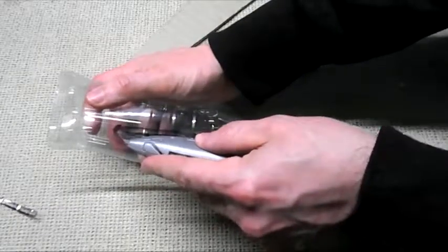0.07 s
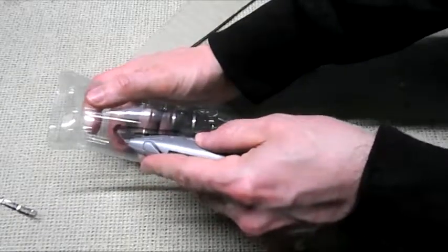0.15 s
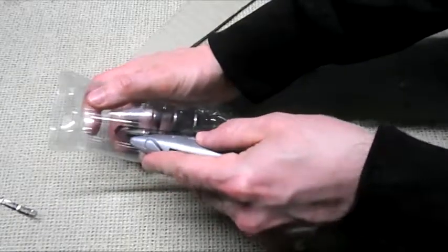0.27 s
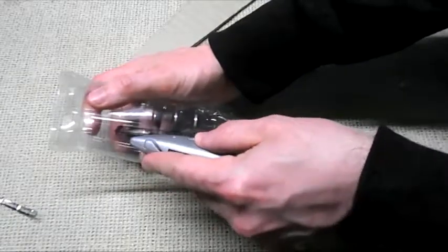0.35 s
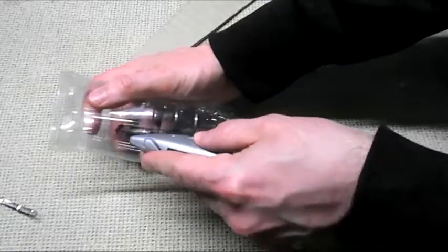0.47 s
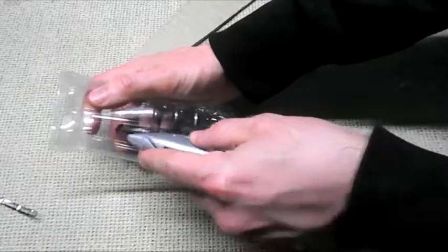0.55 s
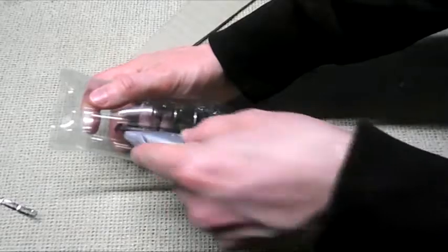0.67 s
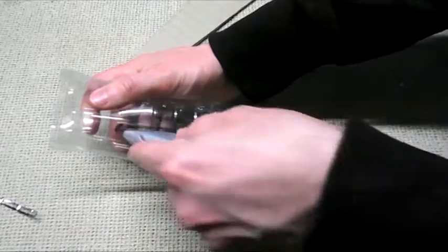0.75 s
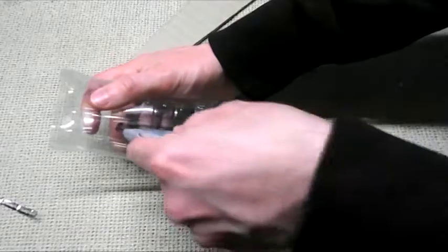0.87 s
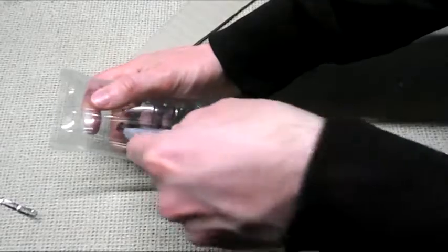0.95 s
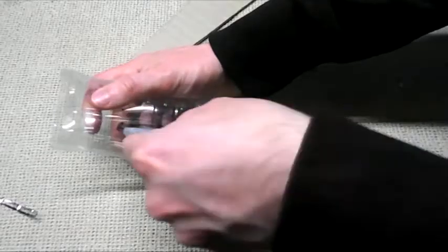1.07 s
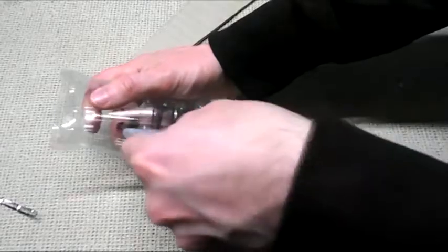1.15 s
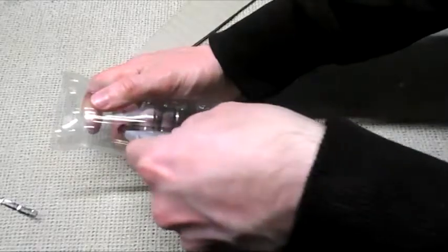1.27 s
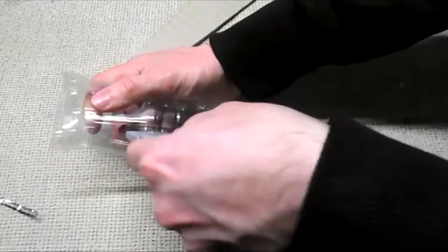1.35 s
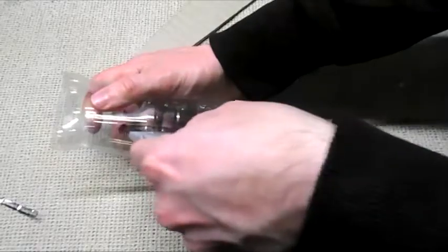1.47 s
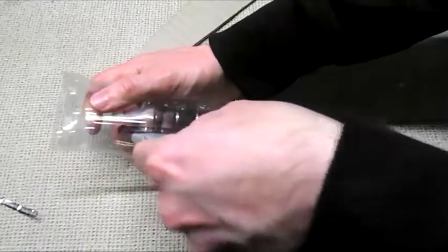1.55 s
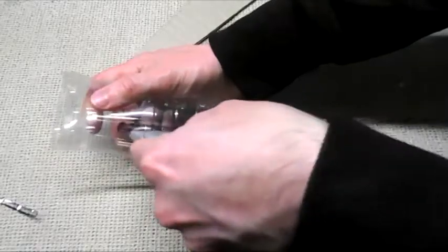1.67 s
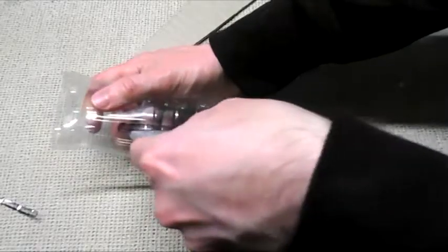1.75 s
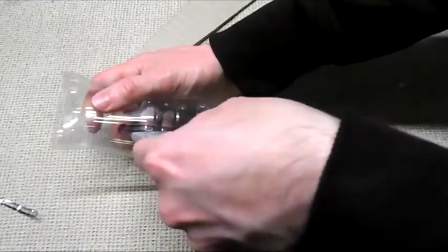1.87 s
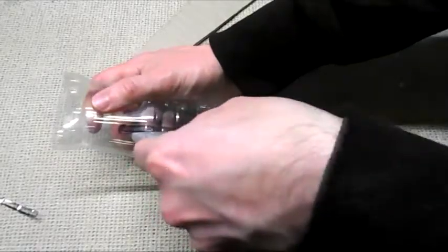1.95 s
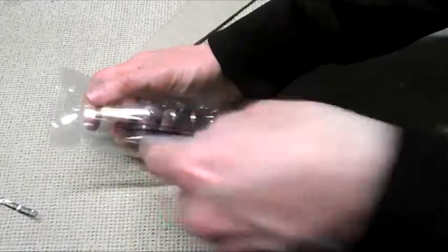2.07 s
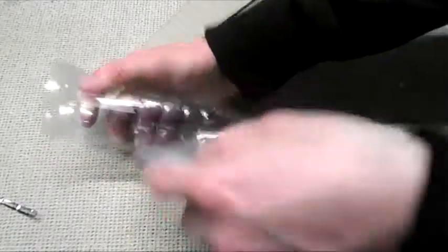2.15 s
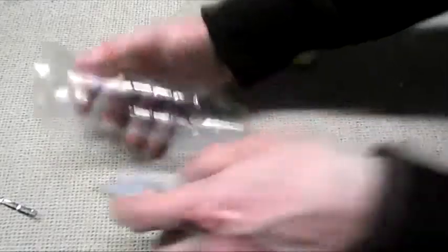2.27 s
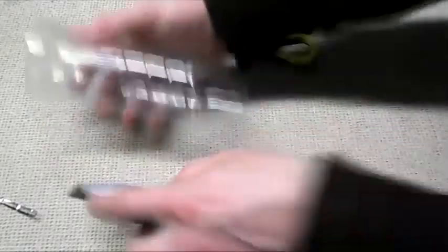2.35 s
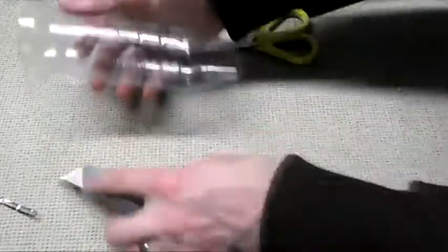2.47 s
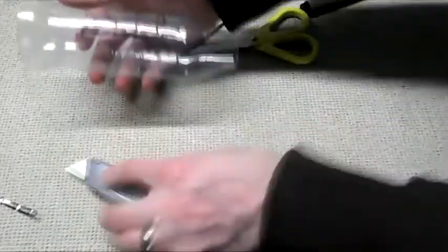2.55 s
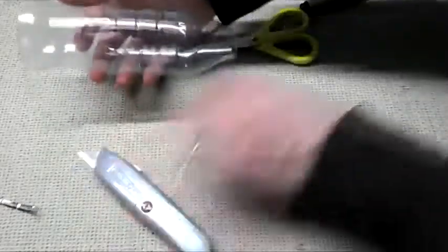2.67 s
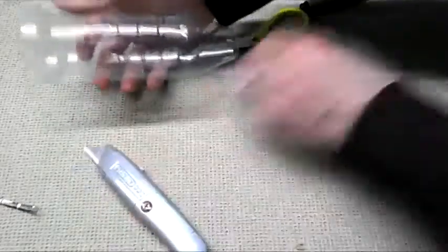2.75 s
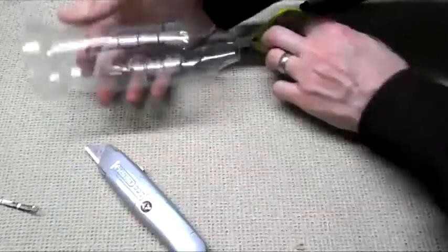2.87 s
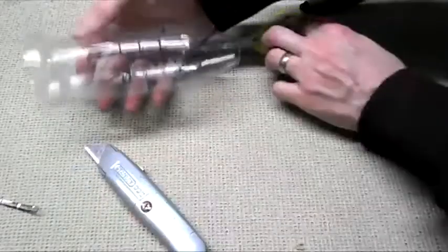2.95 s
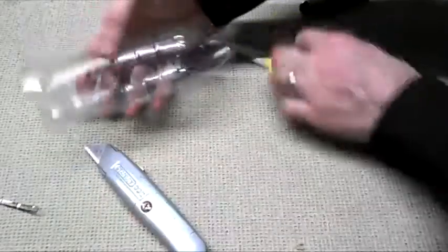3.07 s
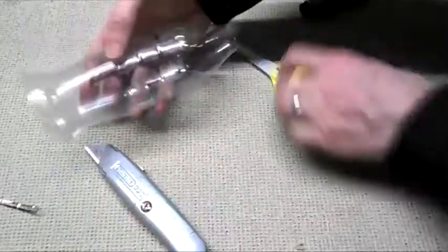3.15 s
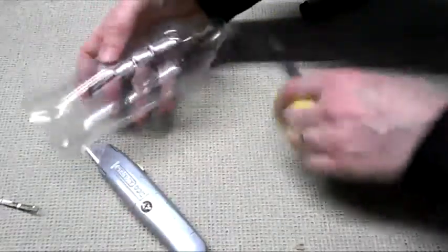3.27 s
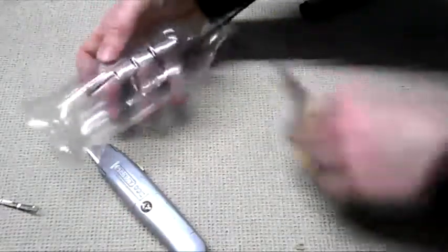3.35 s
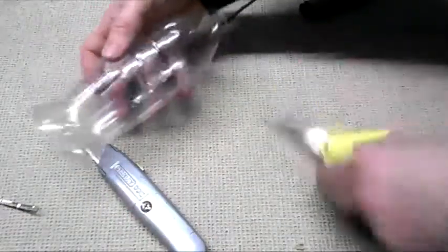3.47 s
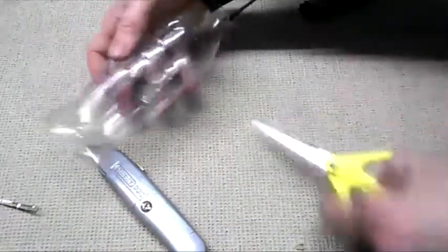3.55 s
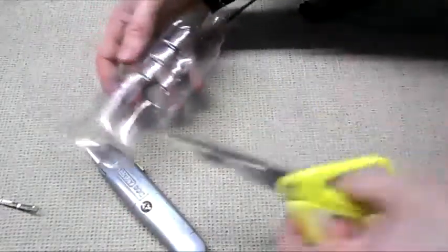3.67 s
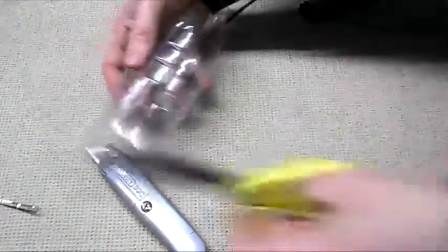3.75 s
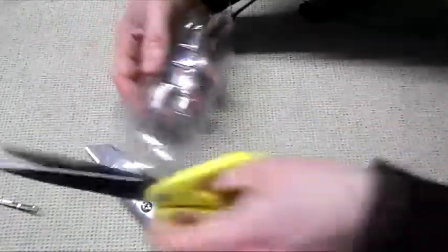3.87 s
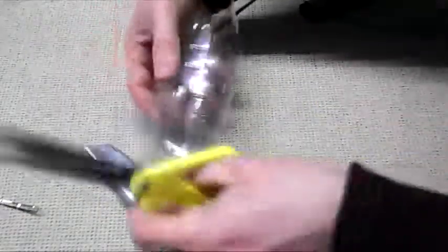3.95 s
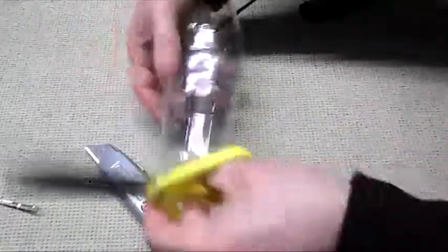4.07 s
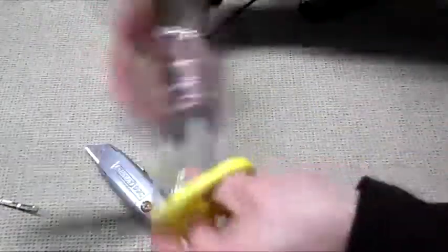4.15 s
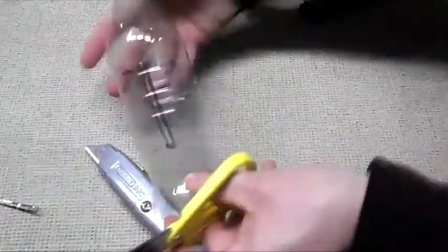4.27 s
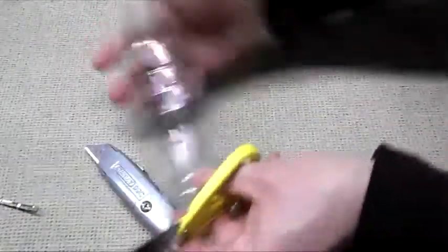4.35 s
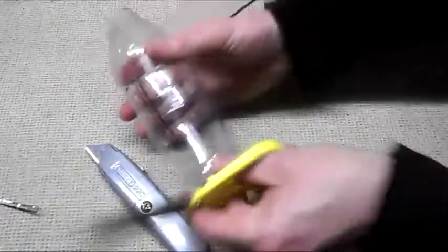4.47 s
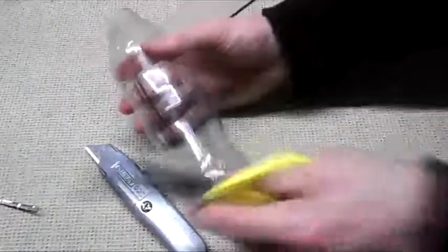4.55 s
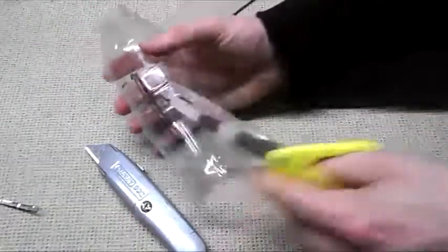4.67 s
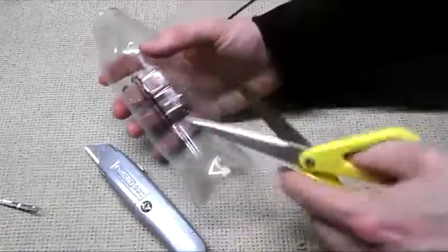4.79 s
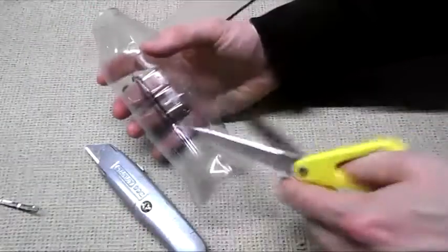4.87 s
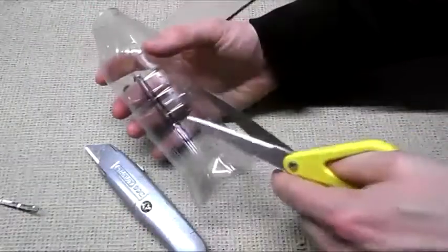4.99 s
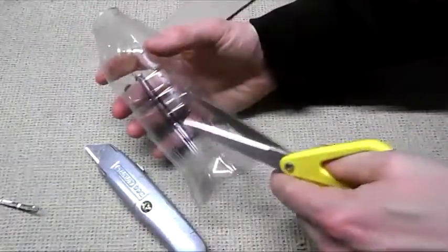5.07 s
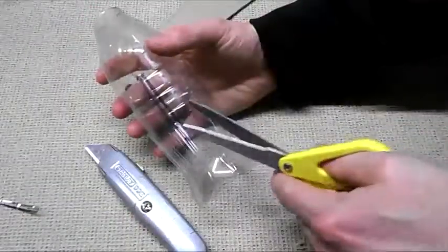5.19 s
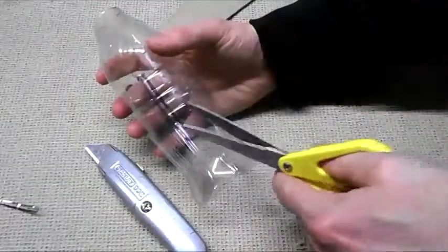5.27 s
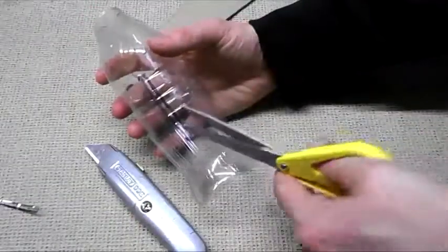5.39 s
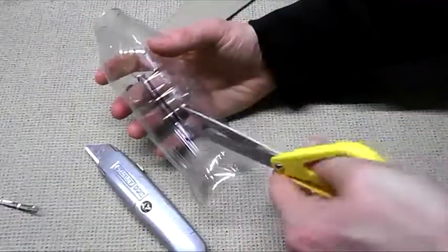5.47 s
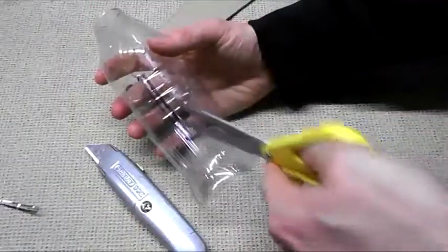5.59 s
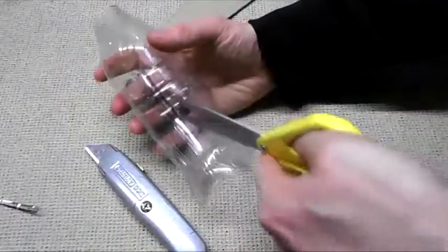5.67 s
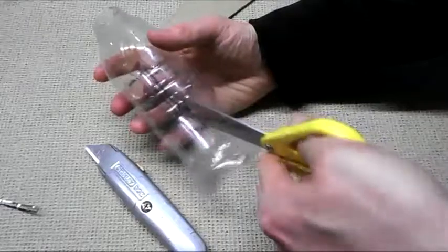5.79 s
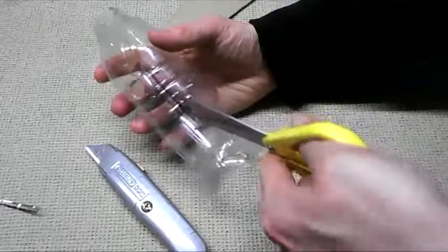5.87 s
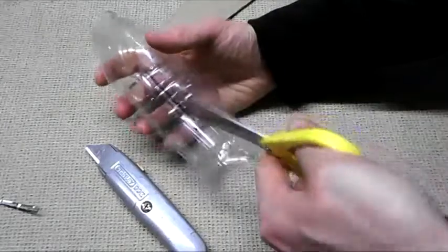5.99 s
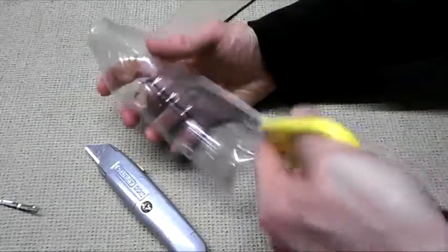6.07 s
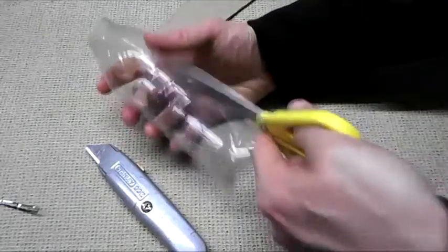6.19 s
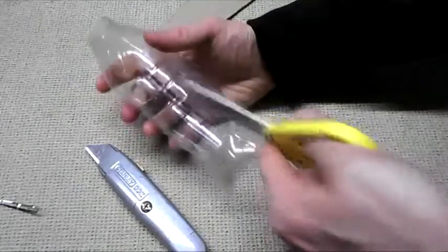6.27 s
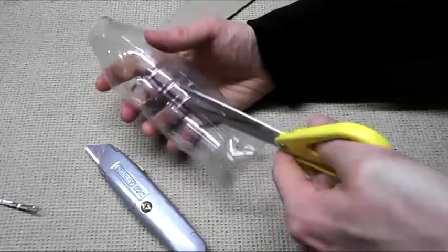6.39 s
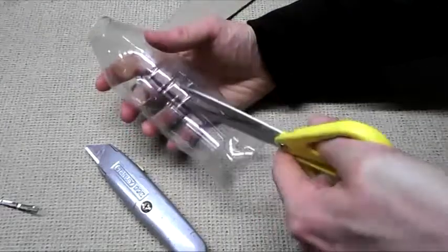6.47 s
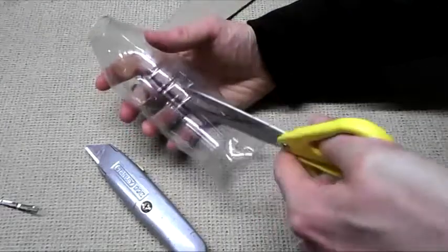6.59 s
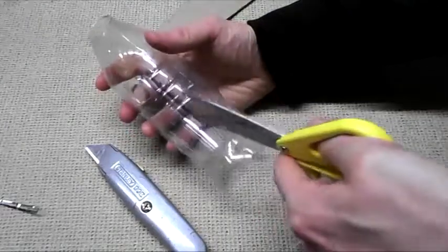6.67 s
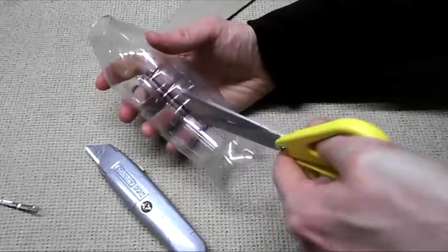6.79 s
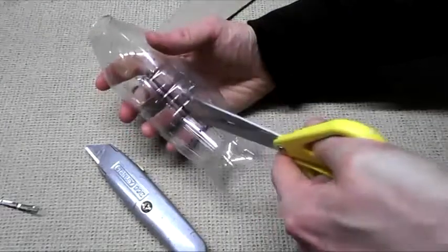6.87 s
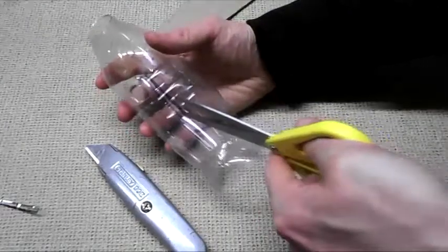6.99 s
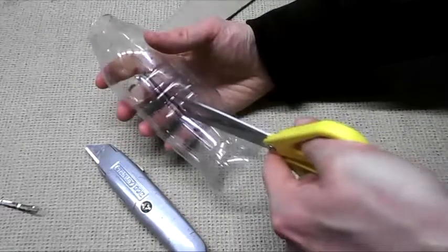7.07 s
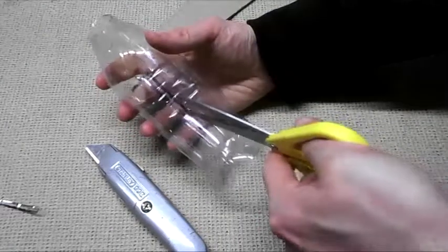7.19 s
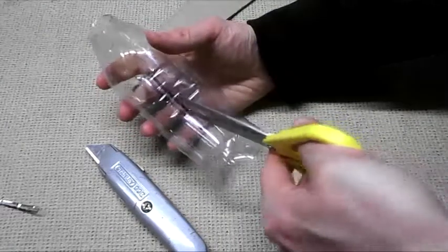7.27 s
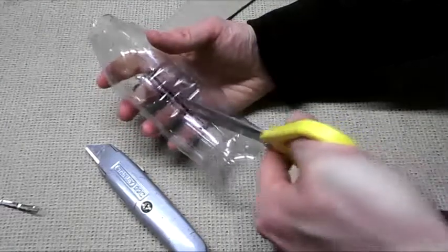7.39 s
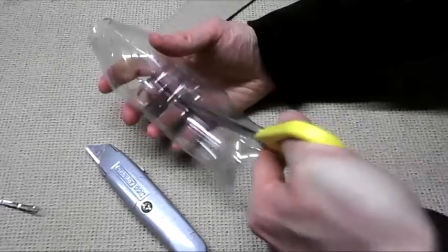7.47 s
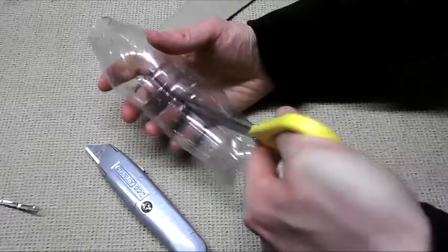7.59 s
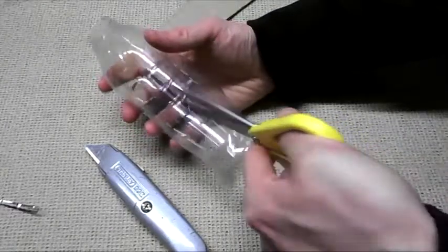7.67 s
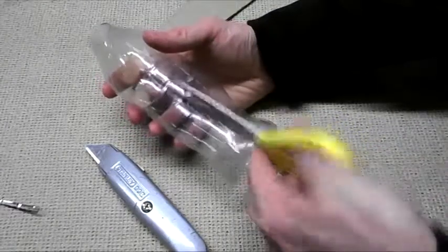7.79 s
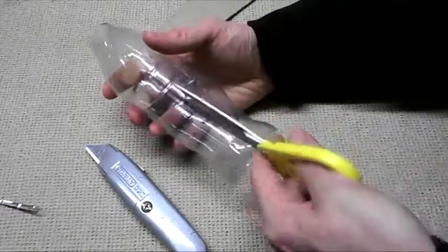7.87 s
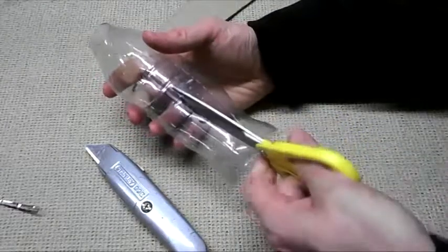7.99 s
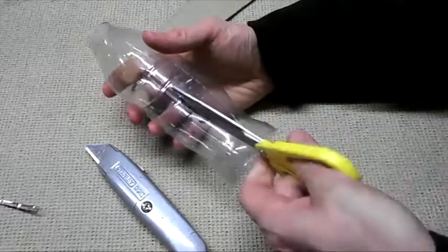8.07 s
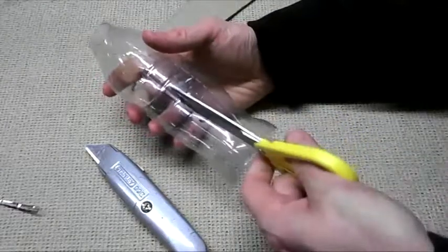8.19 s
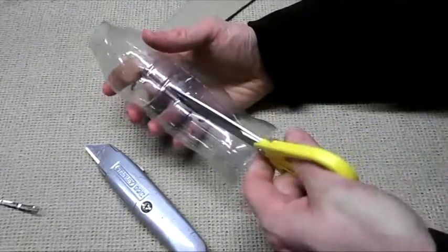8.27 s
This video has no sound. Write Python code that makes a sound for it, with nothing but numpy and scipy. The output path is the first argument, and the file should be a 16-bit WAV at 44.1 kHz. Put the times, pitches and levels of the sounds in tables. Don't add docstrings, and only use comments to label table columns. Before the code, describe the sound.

Thin plastic bottle pops and creaks under a knife, the knife drops with a steel rattle, then scissors drag and snip crackling plastic.

```python
import sys
import numpy as np
from scipy import signal
from scipy.fft import rfft, irfft, next_fast_len
from scipy.io import wavfile
from scipy.ndimage import uniform_filter1d

SR = 44100
rng = np.random.default_rng(int(sys.argv[2]) if len(sys.argv) > 2 else 0)


def bounce(signal):
    frames = np.transpose(np.atleast_2d(signal))
    limited = np.clip(frames, -1, 1)
    pcm = np.round(limited * 32767).astype(np.int16)
    wavfile.write(sys.argv[1], SR, pcm)


def level_to_linear(level):
    exponent = np.asarray(level, float) / 20
    return 10 ** exponent


N = 367353
KNIFE_LANDS_S = 2.627


def unit(x):
    return x / np.sqrt(np.mean(x ** 2) + 1e-20)


def along(points, hz):
    f, value = np.transpose(points)
    return np.interp(np.log(hz + 1), np.log(f + 1), value)


def curves(rows):
    s, *columns = np.transpose(rows)
    return [np.interp(np.arange(N) / SR, s, column) for column in columns]


def filtered(x, response):
    m = next_fast_len(N + 8192)
    return irfft(rfft(x, m) * response(np.fft.rfftfreq(m, 1 / SR)), m)[..., :N]


def bass_cut(x, hz0):
    return filtered(x, lambda hz: (1j * hz / (hz0 + 1j * hz)) ** 2)


def ringing(x, modes):
    def gain(f):
        total = 0
        for k, (center, width, db) in enumerate(modes):
            loss = 1j * f * width
            total = total + (-1) ** k * level_to_linear(db) * loss / (center * center - f * f + loss)
        return total
    power = np.mean(abs(gain(np.linspace(0, SR / 2, 4096))) ** 2)
    return filtered(x, gain) / np.sqrt(power)


def bottle(x, gripped, held):
    lift_s = 2.4
    early = np.arange(N) < lift_s * SR
    return ringing(x * early, gripped) + ringing(x * ~early, held)


def gritty(spread_db, life):
    size = np.zeros(N)
    for span in (life, 5 * life):
        knots = np.minimum(rng.exponential(size=int(N / SR / span) + 4), 2.5)
        size += np.interp(np.arange(N) / SR / span, np.arange(len(knots)), knots)
    return unit(rng.standard_normal(N) * level_to_linear(spread_db * size))


def patchy(x, depth_db):
    z = signal.stft(x, nperseg=256)[2]
    field = uniform_filter1d(rng.standard_normal(z.shape), size=4, axis=0)
    field = uniform_filter1d(field, size=10, axis=1)
    return unit(signal.istft(z * level_to_linear(depth_db * unit(field)), nperseg=256)[1][:N])


def stroked(tables, column, trail=0.067):
    gain = np.zeros(N)
    for rows in map(np.transpose, tables):
        stop = min(N, round((rows[0, -1] + 0.7 * trail) * SR))
        at = np.arange(round(rows[0, 0] * SR), stop)
        rise = (at - at[0]) / SR / 0.012
        fall = (at[-1] - at) / SR / trail
        ends = np.clip(np.minimum(rise, fall), 0, 1)
        gain[at] += ends ** 2 * level_to_linear(np.interp(at / SR, rows[0], rows[column]))
    return gain


def ramps(strokes):
    tables = []
    for s, length, db, change_db, body_db in strokes:
        end_db = db + change_db
        tables.append([(s, db + body_db, db), (s + length, end_db + body_db, end_db)])
    return tables


# f/Hz, level/dB per Hz
HUM = [(25, -30), (44, -15.5), (188, -0.5), (286, 0), (557, -6.5), (1290, -10), (2570, -16.5),
       (6000, -20.5)]


def air():
    spectrum = HUM + [(9000, -30.5)]
    hum = unit(filtered(patchy(rng.standard_normal(N), depth_db=1.5), lambda hz: level_to_linear(along(spectrum, hz))))
    hiss = ringing(patchy(rng.standard_normal(N), depth_db=3.0), [(11140, 1900, 0)])
    return level_to_linear(-60.5) * hum + level_to_linear(-72.0) * hiss


# t/s, level/dB, sharpness/dB (crisp top over hollow), burst t60/s
KNIFE_POPS = [(.0876, -49.5, 29, 0.017), (.278, -30, 6, 0.03), (.2863, -29, 34.5, 0.011),
              (.3965, -40, -7, 0.015), (.417, -36, -7, 0.023), (.5819, -37, 9, 0.015),
              (1.248, -40.5, 3, 0.0085), (1.7345, -33, -1, 0.027), (2.1325, -20.5, 10, 0.0025)]
TURN_POPS = [(3.821, -39.5, 16, 0.011), (3.8361, -35, 11, 0.013), (3.9823, -54.5, 43, 0.062),
             (4.157, -34.5, 6, 0.012), (4.1885, -27.5, 17, 0.064), (4.232, -47, 41, 0.036),
             (4.2993, -36.5, 6.9, 0.031), (4.481, -29, 20.6, 0.0066), (4.5525, -30, 5, 0.023),
             (4.5764, -33, 5.7, .02), (4.6015, -32, 5.5, 0.027), (4.6763, -36, 5.4, 0.099),
             (4.8306, -39, 28, 0.065), (4.8595, -57, 45, 0.012), (5.1361, -27, 1, 0.031)]
SNIP_POPS = [(5.668, -33, -6.5, 0.018), (5.699, -30, 1, 0.035), (5.736, -29, -10.5, 0.06),
             (5.859, -31, 0, 0.04), (5.9955, -41.5, 11, 0.0052), (6.019, -31.5, -5, 0.045),
             (6.0373, -25.5, -1.5, 0.074), (6.116, -31, 21, 0.03), (6.1354, -12, 8, 0.012),
             (6.164, -24, -7, 0.049), (6.204, -22, 11, 0.014), (6.322, -23.5, 2, 0.0042),
             (6.5017, -25.5, 1.5, 0.013), (6.703, -42, 9, .015), (6.777, -26, 18, 0.035),
             (6.7859, -19, 9.5, 0.021), (7.076, -39, 6, 0.021), (7.1063, -34.5, -15, 0.046),
             (7.127, -31, 11.5, 0.05), (7.5446, -8, -7.5, 0.013), (7.8311, -29.5, -2, 0.0093),
             (7.983, -35.5, 3, 0.032)]
# t/s, level/dB
TICKS = [(3.0215, -43), (3.3414, -28.5), (3.3558, -27), (3.457, -27), (3.467, -27.5), (3.479, -24.5),
         (3.4919, -23), (3.507, -25), (3.527, -29), (3.5641, -27.5), (3.5832, -26.5), (3.6023, -24)]
# t/s, level/dB, sharpness/dB, burst t60/s, panel f/Hz
SNAPS = [(0.6666, -25.5, -1, 0.0076, 1540), (0.7405, -26.5, 24.5, 0.0069, 1860),
         (1.1868, -41, 3, 0.033, 1760), (1.2651, -27, -17.5, 0.02, 1520), (1.6137, -41.5, 23, 0.027, 1630),
         (1.696, -24.5, 21.5, 0.014, 2040), (2.1841, -16.5, 11, 0.017, 1240),
         (2.1903, -13.5, 22, 0.006, 2200), (3.8575, -34, 10, 0.015, 2060), (4.046, -38.5, 25, 0.054, 2290),
         (4.0615, -25.5, 4, 0.031, 2290), (5.243, -27.5, 18, 0.015, 2050), (7.5481, -11, 0.5, 0.014, 2110),
         (8.029, -24, 30, 0.024, 2740)]
# t/s, level/dB, sharpness/dB, burst t60/s, panel f/Hz
BUCKLES = [
    (0.3039, -26, 28.5, 0.0075, 1850),
    (2.1523, -36, 14, 0.064, 1700),
    (2.625, -46, -22, 0.0048, 1440),
    (2.998, -35.5, 12, 0.0052, 1116),
    (5.2288, -49.5, 27, 0.0074, 2320),
    (6.2303, -36, 7, 0.021, 1080),
    (7.223, -20, -5.5, 0.0037, 1400),
    (8.0542, -36.5, -28.5, 0.018, 1040),
]


def dents():
    pop_panel_db, snap_panel_db, buckle_panel_db = -9, 1.5, 9
    tick_sharp_db, tick_t60 = 1.5, 0.015
    small = KNIFE_POPS + TURN_POPS + SNIP_POPS + [(s, db, tick_sharp_db, tick_t60) for s, db in TICKS]
    pitch = 1940 * np.exp(0.16 * rng.standard_normal(len(small)))
    flips = [(*row, hz, pop_panel_db) for row, hz in zip(small, pitch)]
    flips += [(*row, snap_panel_db) for row in SNAPS]
    flips += [(*row, buckle_panel_db) for row in BUCKLES]
    return [(s, db + sharp_db / 2, db - sharp_db / 2, db + panel_db, hz, t60)
            for s, db, sharp_db, t60, hz, panel_db in flips]


# f/Hz, width/Hz, level/dB
HOLLOW_GRIPPED = [(741, 172, 0)]


def pops():
    out, t = np.zeros((4, N + 2048)), np.arange(2048) / SR
    for s, crisp_db, hollow_db, panel_db, panel_hz, t60 in dents():
        life = np.clip(t60, .003, .05)
        burst = rng.standard_normal((4, len(t))) * level_to_linear(-60 * t / life) * (1 - np.exp(-t / (0.038 * life)))
        burst[0] = 4.05 * burst[0] + (t < .0004) * 3
        swing = np.sin(2 * np.pi * panel_hz * t) * (1 - np.exp(-t * panel_hz / 0.25))
        burst[1] = swing * level_to_linear(-60 * t * panel_hz / 9)
        burst /= np.linalg.norm(burst, axis=1, keepdims=True)
        levels = level_to_linear([[hollow_db + 9], [panel_db + 14], [panel_db + 14.0], [crisp_db + 10.0]])
        out[:, round(s * SR):][:, :len(t)] += levels * burst
    hollow = bottle(out[0, :N], HOLLOW_GRIPPED, [(854, 205, 0)])
    wall = out[1, :N] + bottle(out[2, :N], [(1700, 130, 0)], [(1700, 580, 0)])
    crisp = ringing(out[3, :N], [(3500, 3050, 3.0), (4730, 9800, -0.5), (10230, 5400, -4.5)])
    return bass_cut(hollow + wall + crisp, hz0=285)


# f/Hz, t60/s
ROOM = [(300, 0.24), (1500, 0.35), (6000, 0.26)]


def room(x, hold, droop_db):
    hz, t, z = signal.stft(rng.standard_normal((4, SR // 2)), SR, nperseg=256)
    held_db = droop_db * np.minimum(t / hold, 1)
    fall_db = held_db + 60 * np.maximum(t - hold, 0) / along(ROOM, hz)[:, None]
    tails = signal.istft(z * level_to_linear(-fall_db), SR, nperseg=256)[1]
    tails = tails / np.linalg.norm(tails[0])
    turns = np.arange(N) // (SR // 4) % 4 == np.arange(4)[:, None]
    late = np.pad(x * turns, ((0, 0), (90, 0)))
    return signal.fftconvolve(late, tails, axes=1)[:, :N].sum(0)


# t/s, f/Hz, level/dB
SQUEAK = [
    [(.15, 2870, -70), (.2, 2880, -70), (.25, 2900, -69)],
    [(3.69, 2380, -64), (3.72, 2400, -55.5), (3.81, 2310, -70)],
    [(6.24, 3200, -57), (6.295, 3350, -51), (6.32, 3270, -59), (6.345, 3220, -51), (6.39, 3200, -59),
     (6.43, 3065, -63), (6.49, 3270, -52.5), (6.53, 3170, -56), (6.59, 2900, -78)],
]


def squeaks():
    out, s = np.zeros(N), np.arange(N) / SR
    for rows in SQUEAK:
        hz, db = curves(rows)
        fade = np.clip(np.minimum(s - rows[0][0], rows[-1][0] - s) / 0.0071, 0, 1)
        waver = 1 + 0.22 * unit(uniform_filter1d(rng.standard_normal(N), 500))
        out += fade * waver * level_to_linear(db) * np.sin(2 * np.pi * np.cumsum(hz) / SR)
    return out


# t/s, length/s, scrape level/dB, change over the stroke/dB, hollow over scrape/dB
KNIFE_STROKES = [
    (.275, 0.081, -35.5, -8.5, -3.5),
    (.37, 0.052, -60.5, 9, -4),
    (.56, 0.11, -57.5, 11, -7.5),
    (.68, 0.21, -45.5, -9, -2),
    (.95, .35, -64.5, 5, -15),
    (1.36, 0.029, -67, 13.5, -1),
    (1.54, 0.1, -52.5, 12, -4),
    (1.7, 0.055, -55, 0, -1.5),
    (2.08, 0.097, -40.5, 3, -1),
    (2.2, 0.17, -40.5, -14.5, -10),
]
SCISSOR_STROKES = [(3.828, 0.11, -46.5, 1, -6), (4.036, 0.095, -31.5, -35, -4.5),
                   (4.11, 0.097, -61.5, 17.5, -6), (4.18, 0.03, -49.5, -4, -1), (4.295, 0.12, -51, -15, -4),
                   (4.469, 0.06, -32, -11, -4), (4.53, 0.19, -52.5, -7, -4.5), (4.812, 0.04, -45, -8, -3),
                   (5.238, 0.05, -26.5, -43, 1.5), (7.77, 0.065, -63.5, 4.5, 6),
                   (6.094, 0.083, -44.5, 16, 1.5), (6.197, 0.081, -52.5, -25, 22.5),
                   (6.275, 0.067, -52, -0.5, 3.5), (6.998, 0.11, -62.5, 2.5, 4.5),
                   (7.097, 0.061, -54, -11.5, 9.5), (7.822, 0.11, -47.5, -23, -0.5),
                   (7.958, 0.078, -58, 17.5, 1), (8.019, 0.13, -52.5, -31, 15), (8.16, 0.079, -74.5, 15, 4)]
CATCHES = [
    (.5, 0.018, -58, 2, -6),
    (.543, 0.0084, -63, 2, -12),
    (6.92, 0.026, -61.5, 0.5, 3),
    (7.048, .014, -56, 0, -1),
    (4.222, 0.034, -46, -3.5, -13),
    (5.619, 0.071, -50.5, -2, -2.5),
    (5.7, 0.15, -50, -6, 0),
    (5.851, 0.088, -54.5, 0, 2.5),
]
SETTLE = [
    (6.77, 0.062, -34.5, -26.5, 0.5),
    (6.83, 0.12, -67.5, -9, 6),
    (7.228, 0.12, -49.5, -11, 7.5),
    (7.55, .11, -40.5, -2, 3),
    (7.66, 0.066, -44.5, -12, 1),
]
# same columns, the last is weight over scrape/dB
SHUFFLES = [
    (2.63, 0.17, -60, -32, 27.7),
    (6.13, 0.22, -60.5, -23, 19.4),
]
# t/s, scrape level/dB, weight on the mat/dB
DRAG = [
    [(2.995, -47, -33), (3.06, -58.5, -61), (3.1, -43, -45.5), (3.2, -42.5, -57), (3.29, -45, -47.5),
     (3.35, -56, -33.5), (3.41, -49, -46.5), (3.49, -49.5, -43), (3.62, -53, -40)],
]
# f/Hz, width/Hz, level/dB
HOLLOW_HELD = [(798, 137, 23), (1235, 160, 14)]
# f/Hz, width/Hz, level/dB
WALL_GRIPPED = [(1700, 177, -6), (2500, 4900, -15.5), (3540, 490, -8), (5400, 280, -19)]
WALL_HELD = [(1520, 1350, -3.5), (2290, 850, 1), (3516, 230, 4), (4800, 2000, -3.5), (11100, 4000, -14.5)]
# f/Hz, width/Hz, level/dB
WEAVE = [(710, 270, 3.5), (1400, 1070, 2), (3200, 590, 2), (4600, 1300, -2.5)]


def rubbing():
    slips = patchy(gritty(spread_db=2.4, life=.002), depth_db=1.8)
    even = patchy(rng.standard_normal(N), depth_db=1.5)
    lumps = slips + 0.98 * gritty(spread_db=3.5, life=0.0088)
    plastic = np.zeros(N)
    kinds = ((KNIFE_STROKES + SCISSOR_STROKES, lumps, slips, .045),
             (CATCHES, lumps, slips, .006),
             (SETTLE, even, even, .045))
    for strokes, push, drive, trail in kinds:
        hollow = unit(bottle(push, HOLLOW_GRIPPED, HOLLOW_HELD))
        wall = unit(bottle(drive, WALL_GRIPPED, WALL_HELD))
        plastic += stroked(ramps(strokes), column=1, trail=trail) * hollow
        plastic += stroked(ramps(strokes), column=2, trail=trail) * wall
    mat_modes = [(105, 49, 1.1), (203.0, 69, 10.0), (321, 94, 10.9), (510, 303, 5.6)]
    mat = unit(ringing(gritty(spread_db=2.5, life=.006), mat_modes))
    weave = unit(ringing(patchy(gritty(spread_db=1.2, life=.001), depth_db=.8), WEAVE))
    weight = stroked(DRAG, column=2) + stroked(ramps(SHUFFLES), column=1)
    return plastic + weight * mat + stroked(DRAG, column=1) * weave


# t/s, level/dB, f/Hz, t60/s
FACETS = [(1.108, -47, 820, 0.032), (2.945, -39, 4960, .002), (2.991, -35, 4000, 0.0018),
          (3.033, -36, 2500, .008), (3.0826, -41, 1110, .015), (3.1063, -26.5, 2600, 0.009),
          (3.149, -27.5, 1810, 0.014), (3.279, -26, 804, 0.0089), (3.3156, -29, 520, 0.027),
          (3.4433, -23.5, 575, 0.019), (3.518, -25, 4500, .007), (3.54, -26, 5000, .007),
          (3.3405, -22, 3200, .006), (3.607, -32, 2240, 0.0078), (4.037, -45, 3030, .012),
          (4.116, -46, 815, .04), (4.1395, -39, 4020, .02), (4.183, -35, 820, 0.03),
          (4.1935, -36, 4180, 0.01), (4.2005, -24, 4070, .012), (4.309, -37, 1300, 0.0072),
          (4.4304, -46.5, 805, 0.03), (4.5302, -27, 4300, 0.022), (.304, -9, 3560, .008),
          (4.8316, -23, 5440, 0.011), (4.8619, -19, 5770, 0.0041), (5.02, -37, 5150, 0.0031),
          (5.6402, -38, 950, 0.044), (5.707, -39, 4330, 0.0073), (5.7285, -32, 840, 0.026),
          (5.756, -29, 1970, .012), (5.7899, -39, 1900, .012), (5.7985, -37, 796, 0.012),
          (5.8857, -42, 806, .03), (4.461, -32, 4930, .005), (7.2228, -6, 8660, .002),
          (3.166, -38.5, 6810, 0.0033), (5.645, -31.5, 910, 0.032), (5.68, -39, 850, 0.023),
          (5.775, -40, 795, 0.018), (5.917, -48, 1010, 0.016), (3.372, -28, 604, .02),
          (.569, -36, 3500, 0.0048), (7.1038, -28, 1480, .006), (5.1361, -32, 553, .02),
          (4.552, -36, 340, 0.026), (6.127, -26, 10900, .003), (6.166, -14, 11000, .003),
          (2.1893, -7.5, 4900, .004), (6.186, -18, 780, .02), (2.659, -8, 10900, .006)]
SINGING = [(2.646, -19.5, 2400, 0.027), (2.661, -28, 4500, 0.082), (2.662, -25, 6300, .05),
           (2.666, -38, 2950, 0.1), (2.717, -33, 9090, .1), (2.7315, -19.5, 6020, 0.05),
           (2.735, -40, 1780, 0.075), (2.742, -30, 9092, 0.11), (2.743, -31, 3470, 0.073),
           (2.793, -38, 3390, 0.083), (2.778, -42, 2400, 0.13), (2.78, -43.5, 1800, 0.14),
           (2.786, -23, 5020, 0.033), (2.79, -40, 2830, 0.076), (2.718, -29, 13500, .15),
           (2.5134, -21.5, 2390, 0.088), (2.5134, -20.5, 3540, 0.06), (2.514, -30.5, 7700, 0.11),
           (2.5136, -29, 4720, 0.099)]


def facets():
    out, t = np.zeros(N + SR), np.arange(SR // 5) / SR
    plastic = [(s, db, hz, min(t60, 28 / hz)) for s, db, hz, t60 in FACETS]
    for s, db, hz, t60 in plastic + SINGING:
        grit = .3 * level_to_linear(-60 * t / .015) * np.diff(rng.standard_normal(len(t) + 1))
        flutter = unit(uniform_filter1d(rng.standard_normal(len(t)), size=300))
        beat = level_to_linear(4 * np.minimum(t / .025, 1) * flutter)
        shape = level_to_linear(db - 60 * t / t60) * (1 - np.exp(-t / (.06 * min(t60, .02))))
        out[round(s * SR):][:len(t)] += shape * (grit - beat * np.sin(2 * np.pi * hz * t))
    return out[:N]


# t/s, length/s, level/dB, f/Hz
PATCHES = [(2.151, 0.028, -33, 1700), (2.142, 0.04, -44, 4200), (3.137, 0.089, -44, 1555),
           (3.14, 0.04, -49, 4600), (3.303, 0.087, -45, 3080), (3.325, 0.072, -56, 5060),
           (4.059, 0.017, -33, 3480), (4.224, 0.045, -47.5, 4380), (4.64, 0.054, -54.5, 1900),
           (4.653, 0.052, -49, 886), (5.723, 0.034, -50, 3480), (5.824, 0.029, -59, 4000),
           (5.891, 0.037, -57, 4200), (5.896, 0.053, -54.5, 2110), (6.792, 0.081, -59, 4400),
           (7.56, 0.11, -53, 4180), (7.555, 0.062, -59, 5400), (7.572, 0.14, -47.5, 2605),
           (1.269, 0.059, -51, 1146), (4.592, 0.027, -47, 900), (4.857, 0.017, -46, 5500),
           (5.014, 0.027, -60, 5850), (2.999, 0.068, -48.5, 230), (3.5, 0.16, -41, 179),
           (7.216, 0.13, -49, 1637), (.69, 0.034, -53, 3600), (2.222, 0.088, -47.5, 4260),
           (3.346, 0.038, -49, 5120), (4.493, 0.022, -45, 2190)]


def patches():
    out = np.zeros(N)
    relative_width = 0.17
    for s, length, db, hz in PATCHES:
        t = np.arange(round(length * SR)) / SR
        span = max(2, round(SR / hz / relative_width))
        slow = uniform_filter1d(rng.standard_normal((2, SR // 4)), span, axis=1)[:, :len(t)]
        band = unit(slow[0] * np.cos(2 * np.pi * hz * t) + slow[1] * np.sin(2 * np.pi * hz * t))
        out[round(s * SR):][:len(t)] += level_to_linear(db) * np.sin(np.pi * t / length) * band
    return bass_cut(out, hz0=88.6)


# t/s, peak level/dB, most shaken part f/Hz
STEEL_HITS = [(2.5054, -18, 4400), (2.5127, -16, 2400), (2.6303, -19, 4630), (2.6444, -15.5, 4640),
              (2.66, -18.5, 4600), (2.6783, -27, 4420), (2.6982, -27, 4460), (2.717, -21, 4970),
              (2.73, -17, 3290), (2.7452, -28.5, 2300), (2.7723, -24, 5400), (2.786, -26.5, 4300)]
# f/Hz, level/dB, t60/s
STEEL = [(2320, -18, 0.1), (2900, -25.5, 0.18), (3396, 8, 0.06), (4640, -4, 0.093), (5640, 12, 0.018),
         (5560, -14, 0.085), (7500, -27, 0.38), (9350, -27.5, 0.12)]
RATTLE = [(1850, -51, 0.1), (2400, -11, 0.23), (2830, -44, 0.045), (3290, -18, 0.03), (4314, 1.5, 0.035),
          (4940, 6.5, 0.03), (5420, 0, 0.045), (6200, 2.5, 0.064)]
# t/s, level/dB
CHATTER = [
    (1.095, -53),
    (1.245, -58),
]
# f/Hz, width/Hz, level/dB
BLADE = [(1690, 85, -16), (2090, 25, -5), (2568, 25, -7), (2875, 20, -2.5), (3650, 40, -3.5),
         (3940, 20, -9), (4565, 28, -6), (4920, 80, -19), (5500, 45, -11)]


def knife():
    out, t = np.zeros(N + SR), np.arange(SR // 8) / SR
    hz, level, t60 = np.transpose(STEEL + RATTLE)[:, :, None]
    for s, db, part_hz in STEEL_HITS:
        in_hand = s < KNIFE_LANDS_S
        clack_db, rise_s = (-1, .0002) if in_hand else (6, .0012)
        chance = rng.standard_normal((3, len(hz), 1))
        strength = 0.35 * level + 3 * chance[0] - 16 * abs(np.log2(hz / part_hz))
        tone = np.sin(2 * np.pi * hz * (1 + 0.015 * chance[1]) * t + 9 * chance[2])
        ring = level_to_linear(strength - 70 * t / np.minimum(t60, .055)) * tone
        clack = level_to_linear(clack_db - 60 * t / 0.035) * rng.standard_normal(len(t))
        out[round(s * SR):][:len(t)] += level_to_linear(db - 5.0) * (ring.sum(0) + clack) * (1 - np.exp(-t / rise_s))
    time = np.arange(N) / SR
    blade = ringing(rng.standard_normal(N), BLADE)
    blade += sum(level_to_linear(db - 8) * np.sin(2 * np.pi * mode_hz * time) for mode_hz, _, db in BLADE)
    creep = stroked([CHATTER], column=1) * unit(blade)
    return bass_cut(out[:N], hz0=1210) + creep


# t/s, peak level/dB, f/Hz
THUDS = [
    (2.189, -12, 292),
    (2.627, -14.5, 221),
    (2.997, -21, 220),
    (3.339, -19.5, 400),
    (3.502, -36, 286),
    (3.607, -33, 182),
    (6.138, -25.5, 343),
    (7.545, -17.5, 255),
]


def thuds():
    out, t = np.zeros(N + SR), np.arange(SR // 2) / SR
    bumps = [(s, db - 3, 476) for s, db in TICKS]
    for s, db, hz in THUDS + bumps:
        out[round(s * SR):][:len(t)] += level_to_linear(db - 3.5 - 60 * t / 0.019) * np.sin(2 * np.pi * hz * t)
    landing = round(KNIFE_LANDS_S * SR)
    hum = level_to_linear(-34.5 - 60 * t / 0.6) * np.sin(2 * np.pi * 130 * t) * np.minimum(t / 0.061, 1)
    out[landing:][:len(t)] += hum
    edge_s = 0.00013
    out[landing - 62:][:len(t)] -= level_to_linear(-8) * t / edge_s * np.exp(1 - t / edge_s)
    return bass_cut(out[:N], hz0=101.5)


# t/s, level/dB
SKID = [
    (2.63, -26),
    (2.67, -35.5),
    (2.71, -44),
    (2.74, -42),
    (2.79, -50),
]


def skid():
    grit = ringing(gritty(spread_db=2.5, life=0.002), [(2600, 2500, -4.5), (4700, 1800, 2)])
    return stroked([SKID], column=1, trail=.03) * unit(grit)


# t/s, length/s, level/dB
SWISHES = [
    (3.73, 0.093, -49.5),
    (3.961, 0.034, -36),
    (4.192, 0.062, -38),
    (4.566, 0.058, -44.5),
    (4.716, 0.032, -51),
    (4.806, 0.055, -40.5),
]


def swish():
    hiss = unit(ringing(gritty(spread_db=3.5, life=0.0027), [(10300, 55000, 0)]))
    slides = [[(s, db), (s + length, db)] for s, length, db in SWISHES]
    return stroked(slides, column=1) * bass_cut(hiss, hz0=4000)


def scene():
    hits, rub = pops() + knife(), rubbing()
    answer = level_to_linear(-12.5) * room(hits + level_to_linear(-2) * rub, hold=0.021, droop_db=10.0)
    table = thuds() + skid()
    details = swish() + squeaks() + patches() + facets()
    return (hits + rub + answer + table + details + air())[None]


# f/Hz, level/dB
MIC = [(4500, 3.5), (6000, -1.5), (7500, -5), (9000, -14), (11000, -12.5), (13000, -29), (14500, -53.5),
       (16500, -77)]
# f/Hz, width/Hz, depth/dB
NOTCHES = [(6990, 307, 20), (8440, 110, 30.5), (10000, 133, 27), (12120, 200, 20), (13700, 200, 26.5)]


def microphone(x):
    m = 4096
    hz = np.fft.rfftfreq(m, 1 / SR)
    db = along(MIC, hz) - sum(depth / (1 + ((hz - c) / w) ** 2) for c, w, depth in NOTCHES)
    cepstrum = irfft(np.log(level_to_linear(db)), m)
    cepstrum[1:m // 2] *= 2
    cepstrum[m // 2 + 1:] = 0
    impulse = irfft(np.exp(rfft(cepstrum)), m)
    x = signal.fftconvolve(x, impulse[None], axes=1)[:, :N]
    return x / (1 + abs(x) ** 8) ** (1 / 8)


def low_pass(x):
    return signal.sosfilt(signal.butter(12, 14900, fs=SR, output="sos"), x)


def record(dry):
    mix = microphone(dry)
    return low_pass(mix)


dry = scene()
out = record(dry)
bounce(out)
```